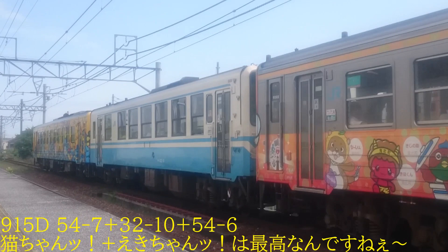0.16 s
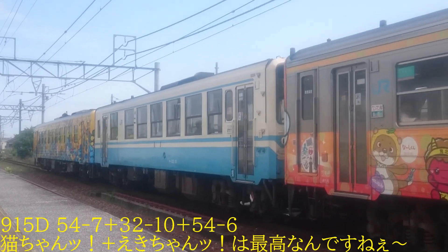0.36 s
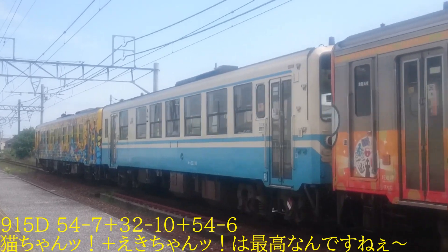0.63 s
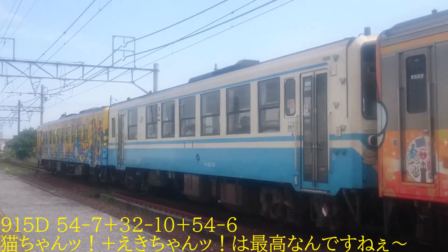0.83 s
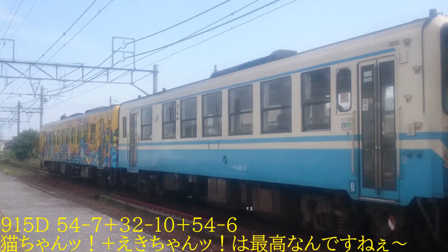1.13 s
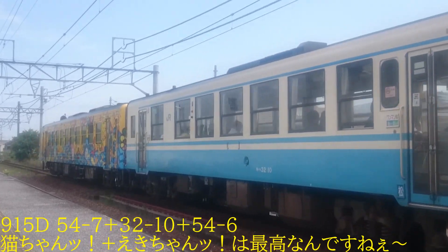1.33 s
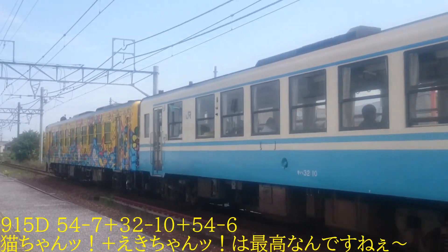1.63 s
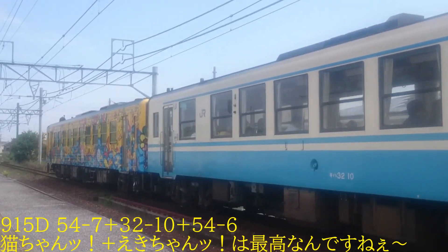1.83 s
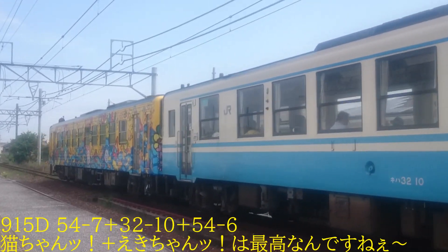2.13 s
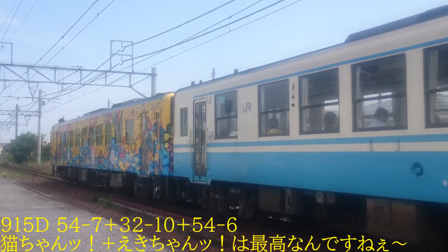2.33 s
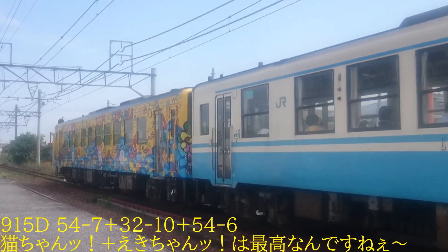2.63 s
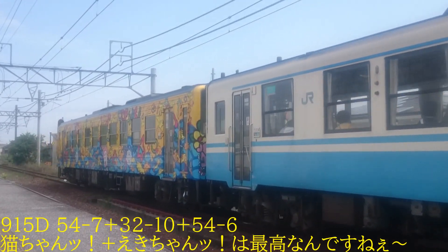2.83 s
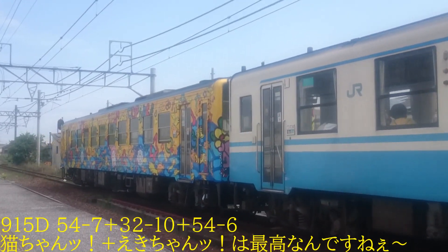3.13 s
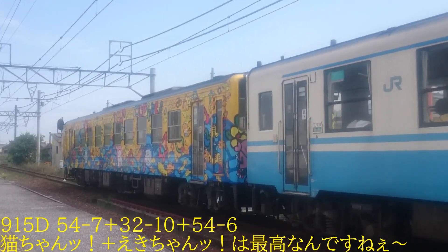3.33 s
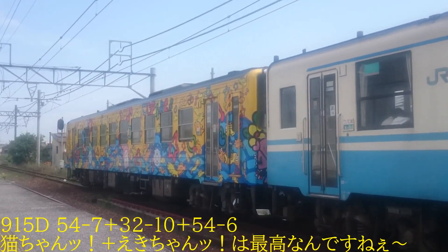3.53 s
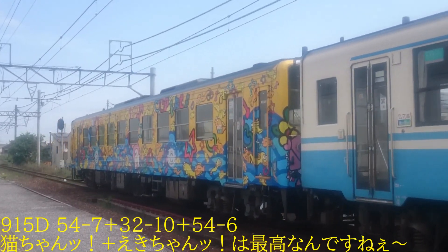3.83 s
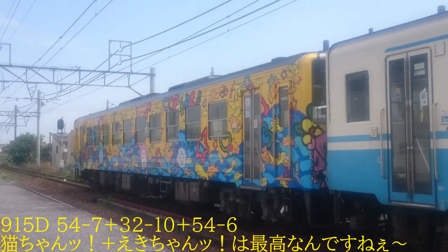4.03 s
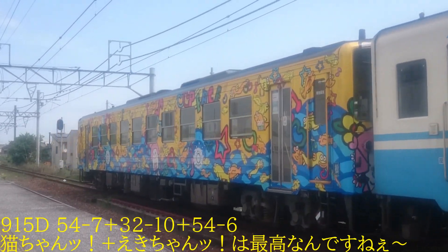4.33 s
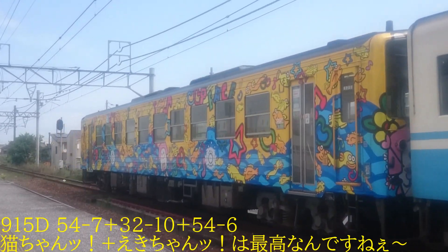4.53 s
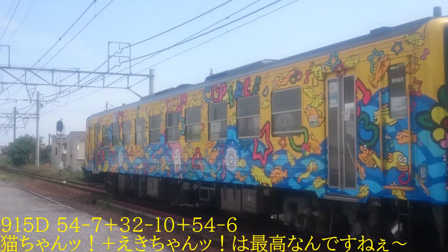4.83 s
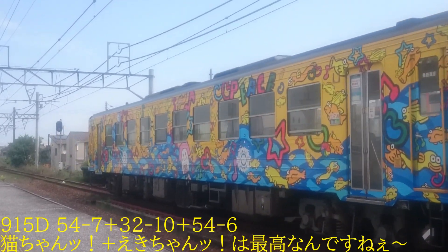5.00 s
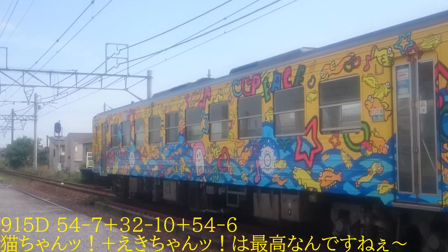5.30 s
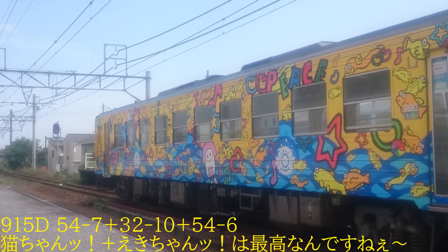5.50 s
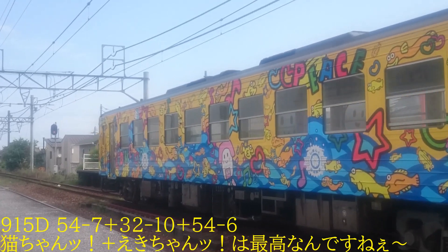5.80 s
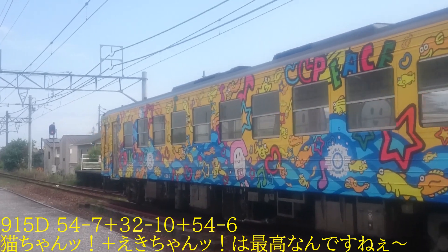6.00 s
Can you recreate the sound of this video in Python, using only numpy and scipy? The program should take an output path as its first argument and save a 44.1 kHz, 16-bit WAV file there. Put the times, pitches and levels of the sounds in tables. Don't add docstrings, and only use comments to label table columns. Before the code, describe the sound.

Low train rumble and joint knocks quickly sink beneath a loud, shrill brake squeal, which wavers, briefly drops out and rattles as the railcars slow.

```python
import sys
import numpy as np
from scipy import signal
from scipy.io import wavfile
from scipy.ndimage import uniform_filter1d, minimum_filter1d

SR = 44100
rng = np.random.default_rng(int(sys.argv[2]) if len(sys.argv) > 2 else 0)


def unload_wav(signal):
    wavfile.write(
        sys.argv[1],
        SR,
        np.round(np.clip(np.atleast_2d(signal).T, -1, 1) * 32767).astype(np.int16),
    )


def makeup_ratio(level_db):
    decades = np.asarray(level_db, float) / 20
    return 10 ** decades


N = 271656
TIME = np.arange(N) / SR

# time in seconds, level in dB.
ROLLING_LEVEL = [(0, -24), (.65, -25), (.95, -23), (1.3, -28.5), (1.62, -36.5), (1.85, -40), (2.97, -41.5),
                 (3.06, -37), (3.3, -41.5), (3.9, -40), (4.02, -39), (4.17, -41), (4.72, -37.5),
                 (4.88, -42), (5.27, -39), (5.4, -42), (5.95, -39), (6.16, -42)]
# time in seconds, level in dB.
ENGINE_NEARNESS = [(0, -4.5), (.6, -3), (.95, -8), (1.45, -4), (2.1, -10), (2.5, -14), (2.75, -12.5),
                   (3.5, -11), (3.8, -13.5), (4.8, -9), (5.3, -7), (6.16, -8)]


def evened(x):
    return x / np.sqrt(np.mean(abs(x) ** 2) + 1e-20)


def read(points, hz):
    f, value = np.transpose(points)
    return np.interp(np.log(hz + 1), np.log(f + 1), value)


def columns(rows, t=TIME):
    s, *rest = np.transpose(rows)
    return [np.interp(t, s, c) for c in rest]


def wobble(width_hz, order=2, size=N):
    z = rng.standard_normal(size) + 1j * rng.standard_normal(size)
    hz = np.fft.fftfreq(size, 1 / SR)
    return evened(np.fft.ifft(z / (1 + (2 * hz / width_hz) ** 2) ** (order / 2)))


def spin(hz, size=N):
    return np.exp(2j * np.pi * np.cumsum(hz * np.ones(size)) / SR)


def add(mix, s, sound):
    part = mix[:, round(s * SR):][:, :sound.shape[1]]
    part += sound[:, :part.shape[1]]


def bumps(rows, stretch=1):
    return sum(height * np.exp(-(2 * (TIME - s) / (length * stretch)) ** 2) for s, length, height in rows)


def rolling():
    # frequency in Hz, density in dB per Hz.
    port_left = [(55, -54.5), (90, -55.5), (160, -53), (420, -56.0), (1130, -61.5), (1600, -62.5),
                 (2650, -59), (4100, -59), (4750, -81.5), (5800, -64.5), (8000, -64), (9800, -68),
                 (12000, -97), (14500, -93.5)]
    port_right = [(55, -58), (90, -46), (160, -47), (420, -47.0), (1130, -51.5), (1600, -55.5), (2650, -53),
                  (4300, -57), (4800, -62.5), (5800, -67.5), (8000, -74.5), (9800, -76.5), (12000, -78.5),
                  (14500, -82.5)]
    # frequency in Hz, likeness from 0 to 1.
    likeness = [(80, .99), (300, .95), (700, .76), (1200, .6), (2000, .45), (3500, .33), (5000, .1),
                (15000, .05)]
    # frequency in Hz, phase in radians.
    left_lead = [(60, 3.5), (400, 3.5), (1000, 2.0), (1500, 0.85), (2500, -2), (4000, -5.5), (6500, -4)]
    # frequency in Hz, width in Hz, level in dB.
    body_rings = [(240.7, 13, 1), (430, 13, 2), (875, 44, 3.5), (1102, 61, 4.5), (2400, 58, 3.5),
                  (2653, 47, 4.5), (4090, 170, -2)]

    frames, hz = N // 256 + 5, np.fft.rfftfreq(1024, 1 / SR)[:, None]
    frame_s = np.arange(frames) * 256 / SR
    a, b, c, d, patches = rng.standard_normal((frames, 513, 5)).T
    patches = uniform_filter1d(patches, size=10, axis=0)
    patches = evened(uniform_filter1d(patches, size=12, axis=1))
    gusts = evened(uniform_filter1d(rng.standard_normal(frames), size=5))
    level_db, = columns(ROLLING_LEVEL, frame_s)
    bass_db, = columns(ENGINE_NEARNESS, frame_s)
    late = frame_s - 1.0
    hiss_db = 7 + np.minimum(3.5 * late, -late)
    low, high = 1 / (1 + (hz / 900) ** 2.5), 1 / (1 + (6000 / (hz + 1)) ** 6)
    rings_db = sum(db / (1 + (2 * (hz - f) / width) ** 2) for f, width, db in body_rings)
    field_db = level_db + rings_db * (1 - 0.032 * (level_db + 21.5))
    field_db = field_db + low * (bass_db + 5.0) + high * hiss_db
    field = makeup_ratio(field_db + 1.13 * patches + 0.69 * gusts)
    same = np.clip(read(likeness, hz), 0, 1)
    right = a + 1j * b
    left = same * right + np.sqrt(1 - same ** 2) * (c + 1j * d)
    left = left * np.exp(1j * read(left_lead, hz))
    z = np.array([left * makeup_ratio(read(port_left, hz)), right * makeup_ratio(read(port_right, hz))])
    cut = 1 / (1 + (45 / (hz + 1)) ** 7.5)
    return makeup_ratio(40.0) * signal.istft(z * field * cut, nperseg=1024, noverlap=768)[1][:, :N]


def engine():
    # time in seconds, level in dB.
    drone_level = [(0, -5), (1.4, 1.5), (1.75, 4), (2.3, -1.5), (2.8, 7), (3.6, 4.5), (4.2, 0.5),
                   (6.16, 0.5)]

    level_db = columns(ROLLING_LEVEL)[0] + 1.02 * columns(ENGINE_NEARNESS)[0] - 10
    depth = 0.7 * np.clip(TIME - 4.3, .2, 1)
    beat = 1 + depth * np.cos(2 * np.pi * (TIME - 5.63) / .293)
    firing = spin(94.0 + 2.1 * wobble(3.0).real)
    throb = makeup_ratio(1.24 * TIME) * (depth + 0.31) * beat * (firing + makeup_ratio(-19.0) * firing ** 2)
    throb = throb * (.7 + 0.53 * wobble(14.0))
    drone = makeup_ratio(columns(drone_level)[0]) * spin(72.0) * wobble(50.0, order=3)
    both = makeup_ratio(level_db) * (throb + drone)
    return np.array([makeup_ratio(9.0) * both * np.exp(2.5j), makeup_ratio(11.0) * both]).real


def squeal():
    # time in
    # seconds, pitch in Hz.
    disc_pitch = [(0, 6705), (.5, 6687), (2.4, 6688), (3.2, 6702), (4.2, 6712), (6.16, 6722)]
    # time in seconds, squeal level in dB, locked share 0-1, left over right in dB.
    pad_pressure = [(0, -29.5, 0, 6), (.5, -27.5, 0.7, 2), (.6, -19, 1, 8), (.78, -15.5, 0.53, 14),
                    (1.15, -12.5, 0.55, 9), (1.6, -11.5, 0.38, 14), (1.84, -13, 0, 20.5),
                    (1.92, -10, 0.7, 29.5), (2.4, -10.5, 1, 25), (2.8, -13.5, 0.42, 11),
                    (3.5, -11.5, 0.8, 17), (4.3, -13, 0.68, 19), (5.0, -13.5, 1, 17), (5.6, -13, 0.5, 9.5),
                    (6.16, -9.5, 0.8, 34)]
    # middle in seconds, length in seconds, depth in dB.
    pad_slips = [(0.288, 0.044, 1), (0.506, 0.028, 8), (0.689, 0.1, 3.5), (0.884, 0.064, 1),
                 (1.061, 0.065, 3.5), (1.186, 0.024, 5), (1.531, 0.025, 3.5), (1.671, 0.03, 3.5),
                 (1.825, 0.039, 3), (2.424, 0.038, 3), (2.646, 0.051, 2), (2.741, 0.012, 5),
                 (3.061, 0.4, 1), (3.141, 0.014, 4), (3.426, 0.039, 7), (3.553, 0.054, 6.5),
                 (3.698, 0.022, 7.5), (3.975, 0.089, 4), (4.1, 0.011, 16), (4.229, 0.049, 7),
                 (4.447, 0.048, 4.5), (4.574, 0.12, 1), (4.971, 0.065, 1.5), (5.039, 0.027, 6.1),
                 (5.177, 0.016, 8.5), (5.571, 0.057, 2.5), (5.705, 0.027, 5), (5.893, 0.13, 3),
                 (6.002, 0.02, 7.5), (6.084, 0.039, 4.5)]
    # middle in seconds, length in seconds, upper side tone level in dB.
    pad_chatter = [
        (3.45, .1, -54),
        (3.7, .26, -50),
        (4.1, .2, -43),
        (4.36, .2, -46),
        (4.53, .1, -44),
        (4.67, .2, -34),
        (4.8, .1, -44),
        (5.07, .2, -52),
        (5.33, .15, -42),
        (5.65, .2, -55),
    ]
    # multiple of the squeal, multiple of the chatter, left in dB, right in dB.
    side_tones = [
        (1, 1, 4, 2),
        (1, -1, -2, 10),
        (1, -2, -8, 7),
        (2, -2, -14, 4),
        (2, -1, -10, 10),
        (2, 1, -3, 2),
        (2, 2, -12, 3),
    ]

    hz, = columns(disc_pitch)
    level_db, lock, pan_db = columns(pad_pressure)
    lock = np.clip(lock, .01, .99)
    slip_db = 2.14 * bumps(pad_slips, .88)
    tone_db = level_db + 10 * np.log10(lock)
    fuzz_db = level_db + 10 * np.log10(1 - lock) - 4.5
    overtone_db = level_db - 30 + 5.5 * lock - 0.97 * TIME
    carrier = spin(hz + 0.77 * wobble(3.9).real)
    tone = makeup_ratio(tone_db + 7.0) * (1 + 0.12 * wobble(31.0) + 0.37 * wobble(27.0))

    def neighbours():
        fuzz = makeup_ratio(fuzz_db + 12.0) * spin(58.0) * wobble(100.0, order=3)
        return fuzz + makeup_ratio(level_db + 3.5) * spin(30.0) * wobble(238.0, order=3)

    near, other = neighbours(), neighbours()
    right = (makeup_ratio(-pan_db) * tone + makeup_ratio(-17.5) * (0.14 * near + 1.6 * other)) * np.exp(-2.6j)
    left = tone * makeup_ratio(-slip_db) + near * makeup_ratio(-0.71 * slip_db)
    first = carrier * np.array([left, right * makeup_ratio(-0.14 * slip_db)])
    doubled = [0.4 * (0.4 + wobble(20.0)) + spin(90.0) * wobble(330.0, order=3) for _ in "ab"]
    second = carrier ** 2 * makeup_ratio(overtone_db - .5 * slip_db) * doubled * makeup_ratio([[-6.0], [4.0]])

    out = first + second
    loud = np.sqrt(uniform_filter1d(abs(first[0]) ** 2, size=12000))
    depth = bumps([(s, length, makeup_ratio(db + 10.5)) for s, length, db in pad_chatter]) / loud
    chatter = spin(910 + 5.0 * wobble(15.0).real)
    for multiple, k, left_db, right_db in side_tones:
        base = first if round(multiple) == 1 else second
        growth = (depth / depth.max()) ** (.7 * (abs(round(k) - .5) - .5))
        out += base * chatter ** round(k) * depth * growth * makeup_ratio([[left_db], [right_db]])
    return out.real


def thuds():
    # start in seconds, peak in dB, ring in Hz, decay by 60 dB in seconds.
    knocks = [
        (.065, -13, 74, .5),
        (.22, -13, 280, .15),
        (.222, -13, 98, .17),
        (.568, -10, 108, .2),
        (.575, -19, 620, .12),
        (.225, -23, 560, .1),
        (5.045, -32, 1000, .08),
        (5.125, -30, 700, .09),
        (2.83, -35, 900, .1),
        (5.88, -30, 600, .12),
    ]

    out, age = np.zeros((2, N)), TIME[:SR // 2]
    for s, db, hz, t60 in knocks:
        swell = makeup_ratio(db - 60 * age / t60) * (1 - np.exp(-age / 0.018))
        ring = swell * spin(hz, len(age)) * (1 + .3 * wobble(.4 * hz, size=len(age)))
        add(out, s, np.array([makeup_ratio(-8.0) * ring * np.exp(2.6j), ring]).real)
    return out


def squeaks():
    # start in seconds, length in seconds, pitch in Hz, width in Hz, level in dB.
    whistles = [(3.5, .25, 3870, 40, -44), (3.84, .3, 2620, 40, -43), (3.84, .26, 4140, 50, -45),
                (3.4, .25, 3640, 60, -49), (4.55, .34, 2480, 120, -45), (4.95, .3, 5000, 60, -56),
                (5.26, .14, 4150, 50, -49), (5.3, .55, 5100, 60, -57), (5.597, .26, 2200, 90, -51),
                (2.215, .045, 3480, 220, -39), (.85, .62, 2680, 45, -30), (1.0, .35, 3480, 50, -34),
                (5.5, .6, 190, 14, -51), (.65, .55, 3300, 1500, -30)]

    out, age = np.zeros((2, N)), TIME[:3 * SR // 4]
    for s, length, hz, width, db in whistles:
        swell = np.sin(np.pi * np.clip(age / length, 0, 1))
        fuzz = wobble(width, size=len(age)) + .5 * (width < 500)
        whistle = (swell * spin(hz, len(age)) * fuzz).real
        add(out, s, whistle * makeup_ratio([[db - 8], [db]]))
    return out


def scene():
    return rolling() + engine() + squeal() + thuds() + squeaks()


def limiter(dry):
    peak = uniform_filter1d(-minimum_filter1d(-abs(dry), size=21), size=41)
    ceiling = .96 - .13 * np.clip((TIME - 2.6) / 1.3, 0, 1)
    return dry / (1 + (peak / ceiling) ** 5) ** (1 / 5)


def converter(limited):
    # start in seconds, length in seconds, offset as a share of full scale.
    air_pushes = [
        (1.0, 1.8, .06),
        (1.1, .1, .08),
        (1.92, .17, .2),
        (2.25, .3, .025),
    ]

    push = sum(offset * np.sin(np.pi * np.clip((TIME - s) / length, 0, 1)) ** 2
               for s, length, offset in air_pushes) * [[1], [0]]
    fast = signal.resample_poly(limited - push, 160, 147, axis=1)
    clipped = np.clip(fast, -.84, .86)
    back = signal.resample_poly(clipped, 147, 160, axis=1)[:, :N] + push
    folded = signal.resample_poly(clipped - fast, 147, 160, axis=1)[:, :N]
    presence = signal.butter(2, (4000, 5900), "band", fs=SR, output="sos")
    top = signal.butter(4, 14000, "high", fs=SR, output="sos")
    back = back + makeup_ratio(11.0) * signal.sosfilt(presence, folded)
    return back - .5 * signal.sosfiltfilt(top, folded)


def starved(x):
    # frequency in Hz, left in dB, right in dB.
    hush = [(4400, -40, -40), (5400, -16, -26), (6000, -25, -26), (7600, -20, -15), (8800, -8, -13),
            (10500, -7, -16), (12000, -12, -21), (13400, -26, -24), (15000, -16, -17)]

    hz, _, z = signal.stft(x, SR, nperseg=2048, noverlap=1024)
    bands = (abs(z[:, :1024]) ** 2).reshape(2, 64, 16, -1).mean(axis=2)
    midrange = uniform_filter1d(bands[:, 5:12].mean(axis=(0, 1)), size=9)
    floor = makeup_ratio(columns(hush, hz[8:1024:16]))[:, :, None] ** 2
    keep = bands > midrange * (midrange / 1e-6) ** -.2 * floor
    z[:, :1024] *= np.repeat(keep, 16, axis=1)
    return signal.istft(z, SR, nperseg=2048, noverlap=1024)[1][:, :N]


def band_limit(x):
    return signal.sosfilt(signal.butter(12, 15570, fs=SR, output="sos"), x)


def record(dry):
    back = converter(limiter(dry))
    back = signal.sosfilt(signal.butter(2, 48.0, "high", fs=SR, output="sos"), back)
    back = back * np.clip((TIME[-1] - TIME) / .003, 0, 1)
    return band_limit(np.clip(starved(back), -1, 1))


dry = scene()
out = record(dry)
unload_wav(out)
```